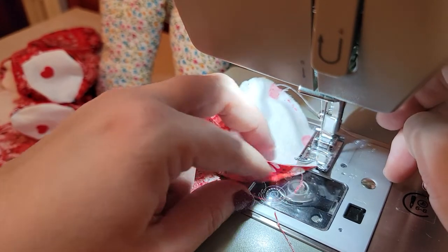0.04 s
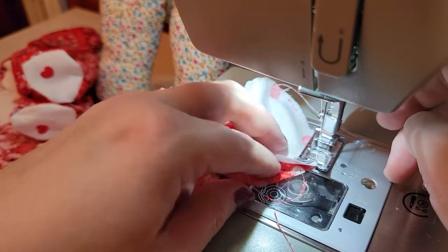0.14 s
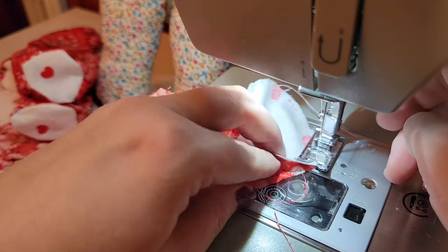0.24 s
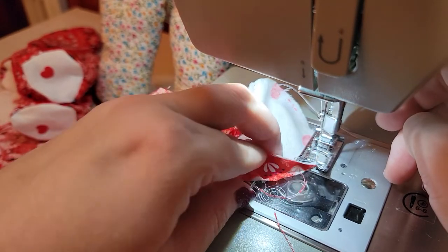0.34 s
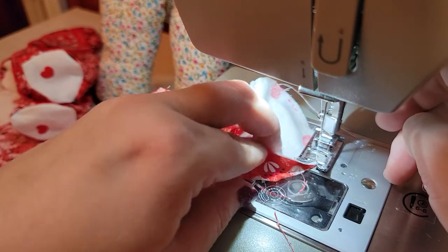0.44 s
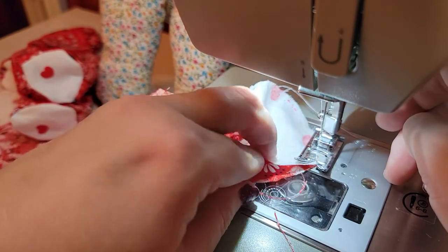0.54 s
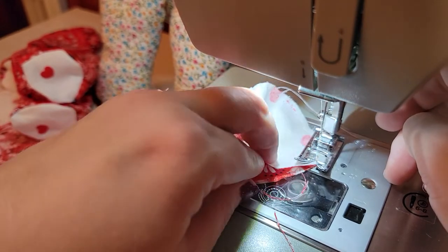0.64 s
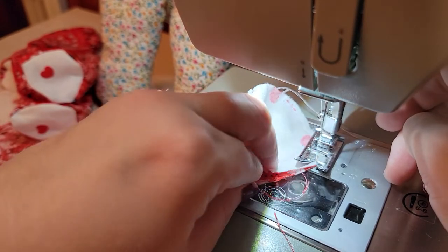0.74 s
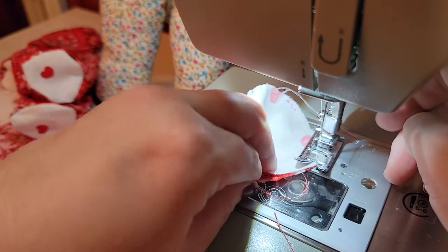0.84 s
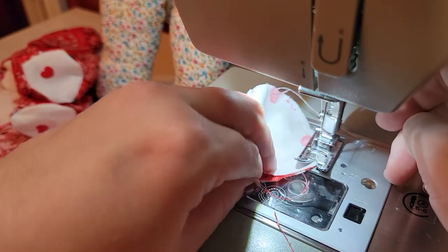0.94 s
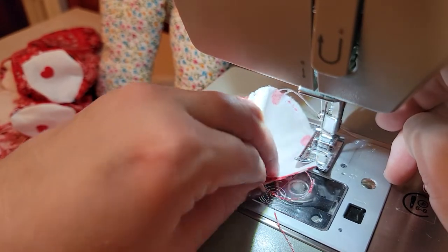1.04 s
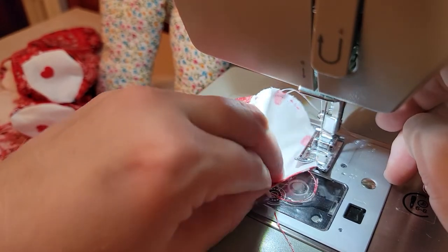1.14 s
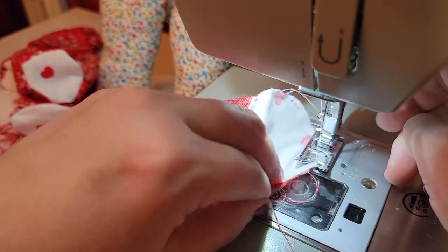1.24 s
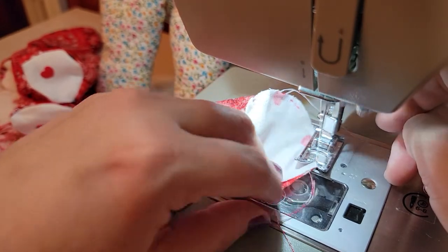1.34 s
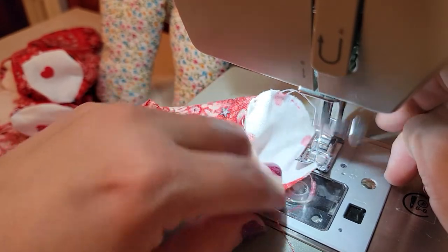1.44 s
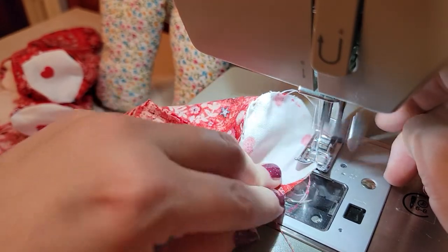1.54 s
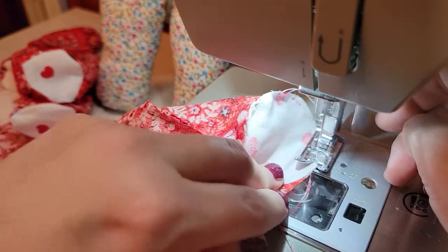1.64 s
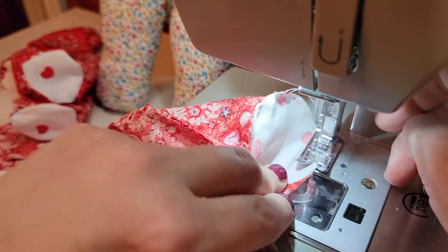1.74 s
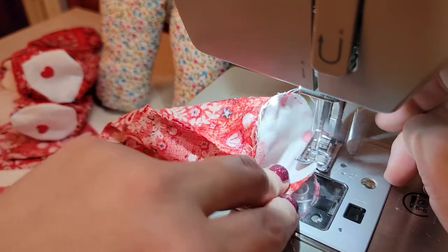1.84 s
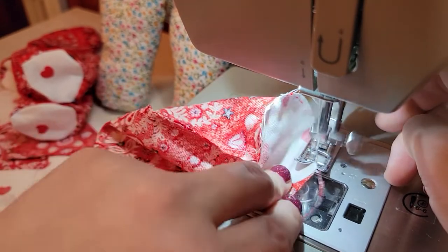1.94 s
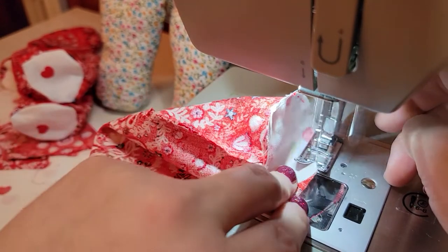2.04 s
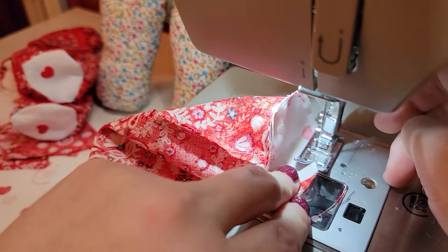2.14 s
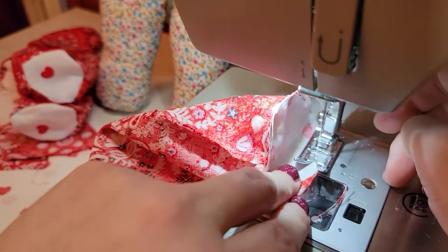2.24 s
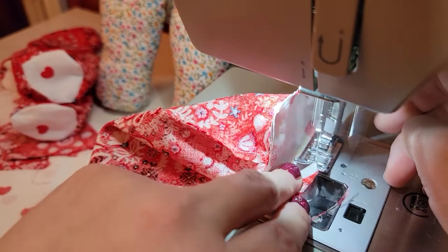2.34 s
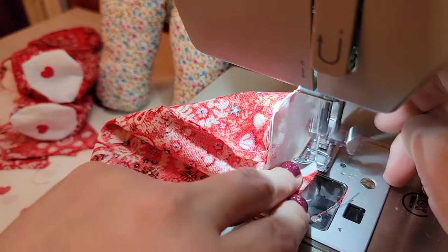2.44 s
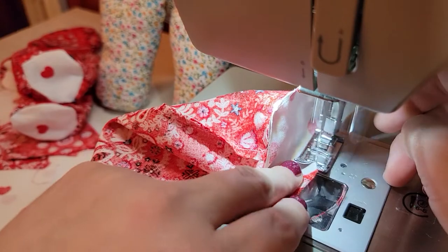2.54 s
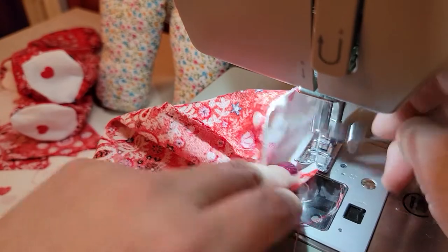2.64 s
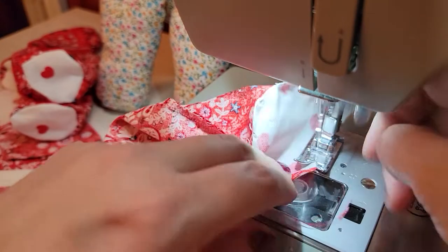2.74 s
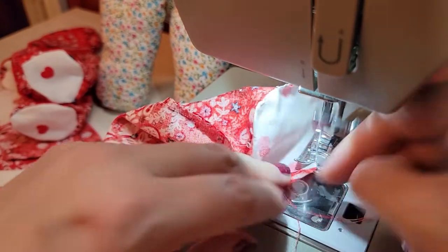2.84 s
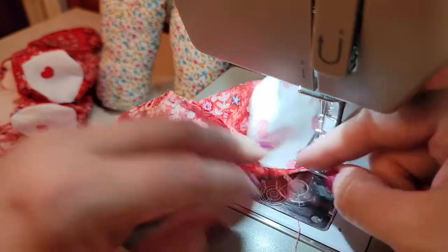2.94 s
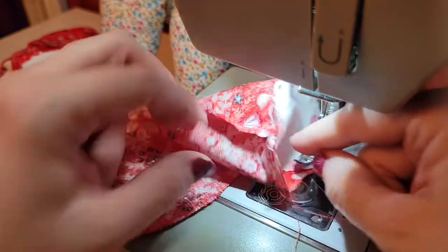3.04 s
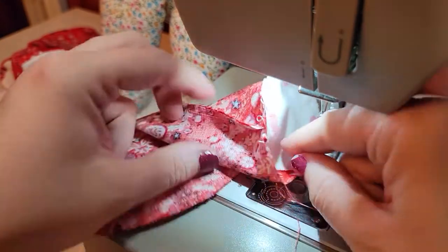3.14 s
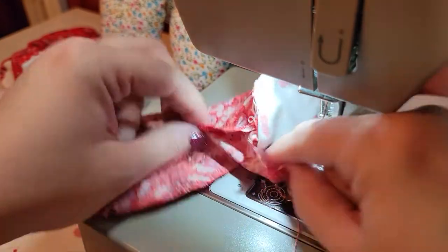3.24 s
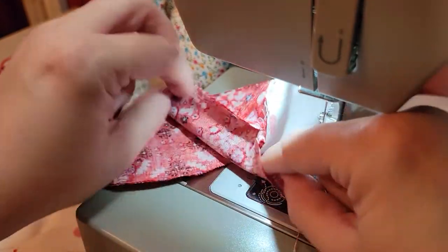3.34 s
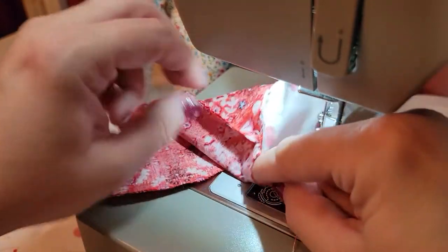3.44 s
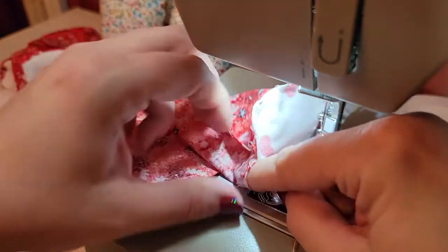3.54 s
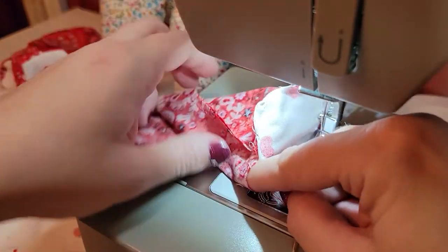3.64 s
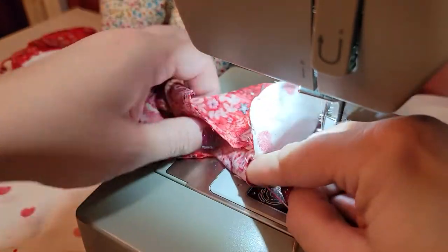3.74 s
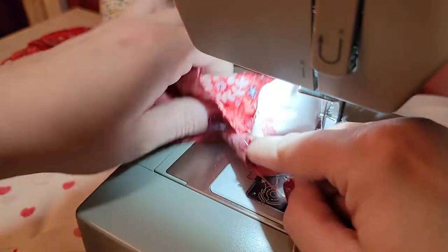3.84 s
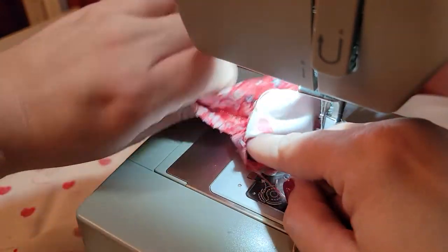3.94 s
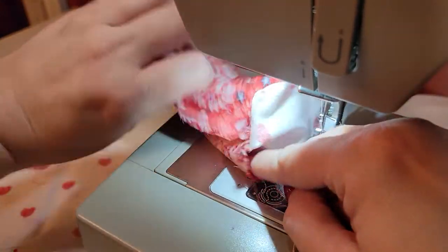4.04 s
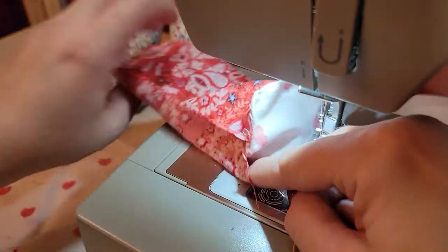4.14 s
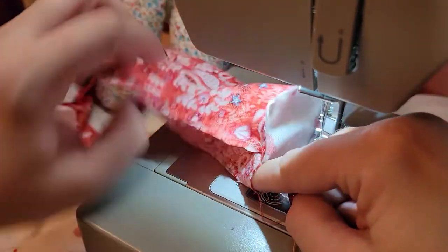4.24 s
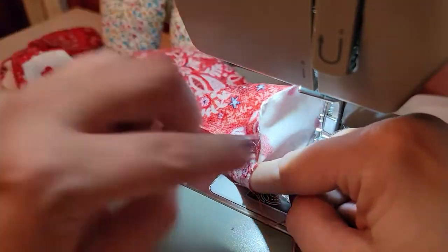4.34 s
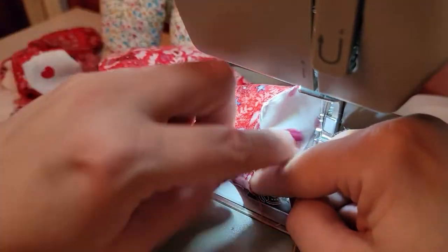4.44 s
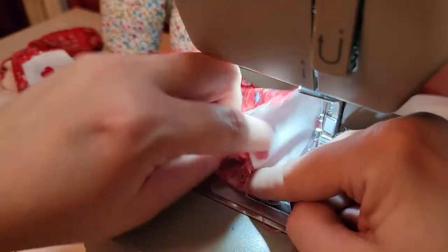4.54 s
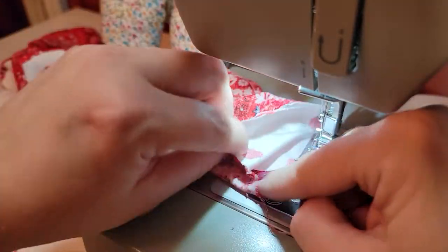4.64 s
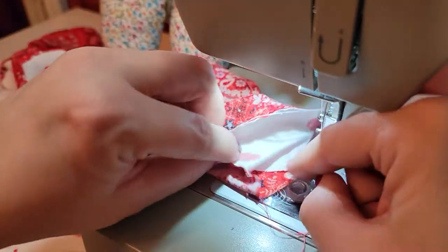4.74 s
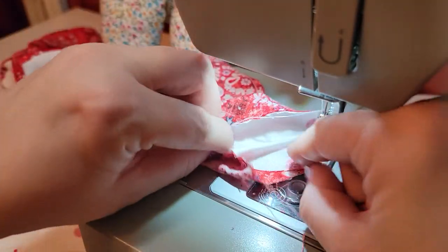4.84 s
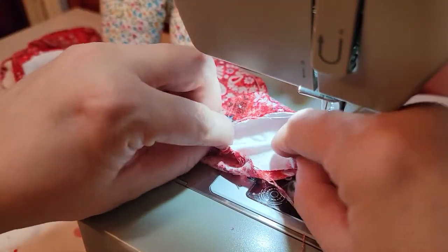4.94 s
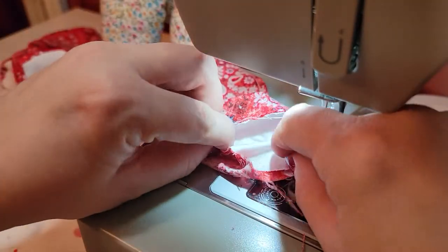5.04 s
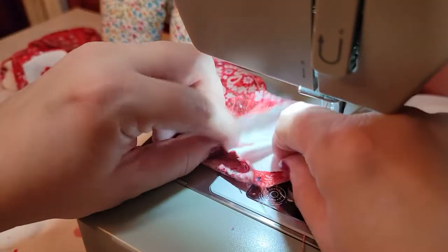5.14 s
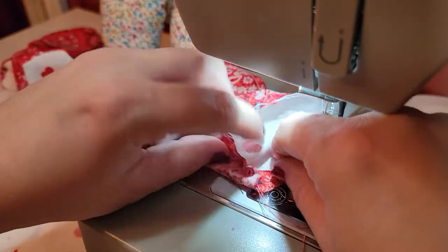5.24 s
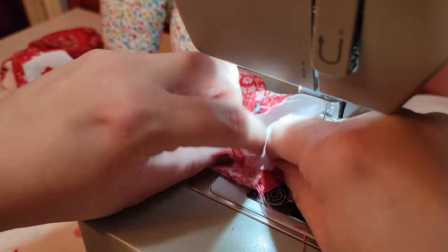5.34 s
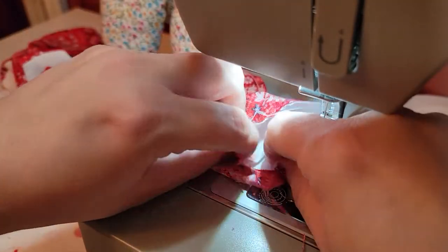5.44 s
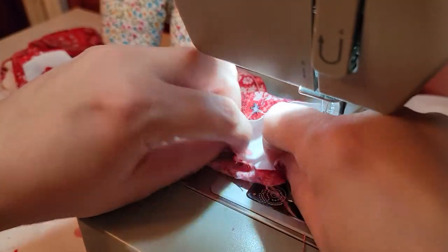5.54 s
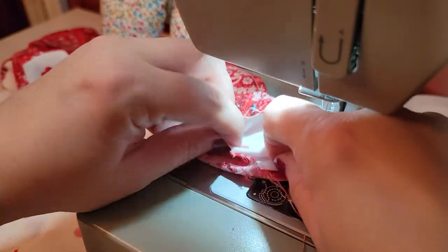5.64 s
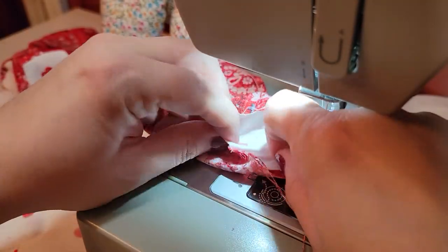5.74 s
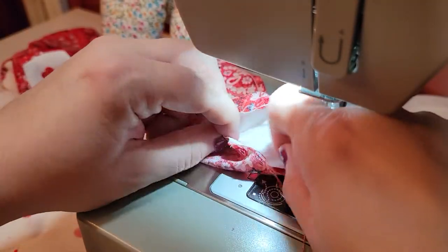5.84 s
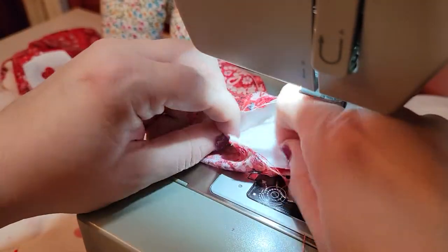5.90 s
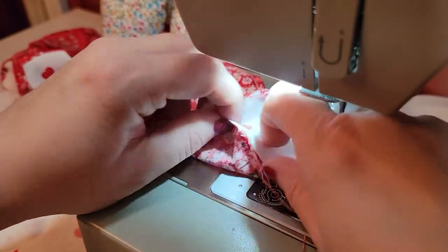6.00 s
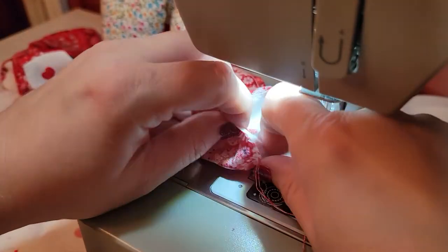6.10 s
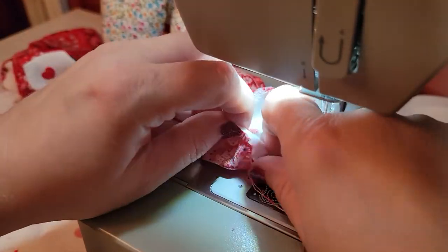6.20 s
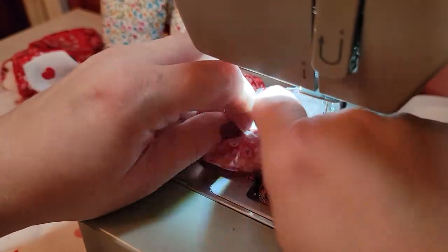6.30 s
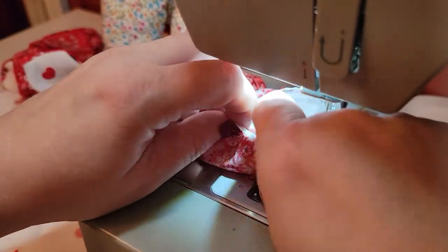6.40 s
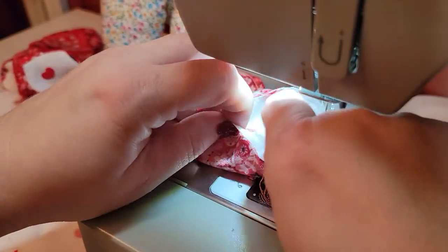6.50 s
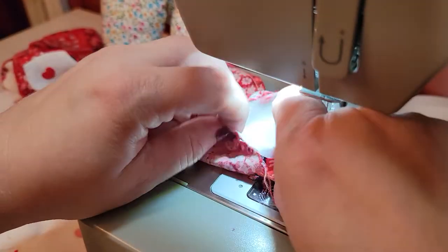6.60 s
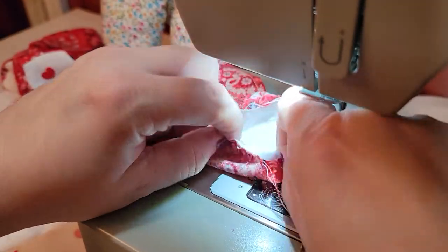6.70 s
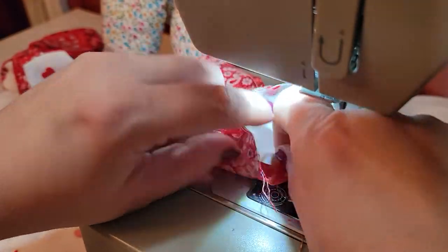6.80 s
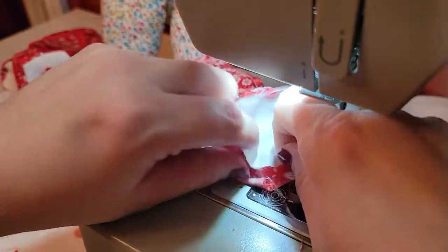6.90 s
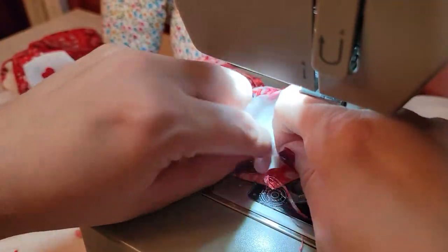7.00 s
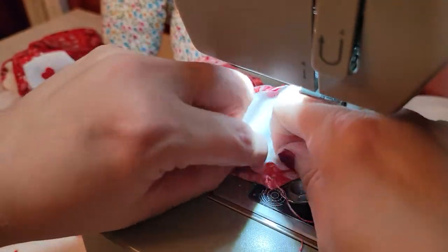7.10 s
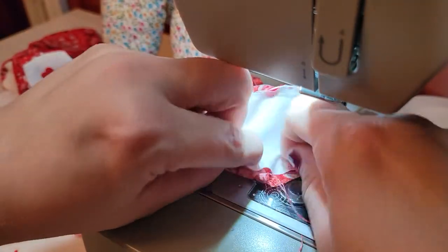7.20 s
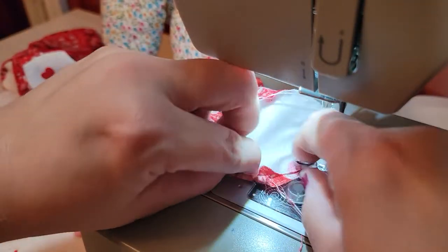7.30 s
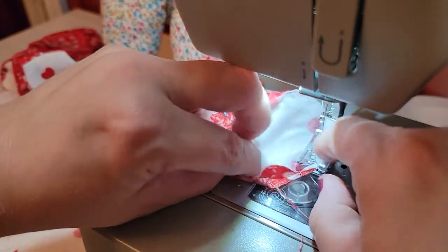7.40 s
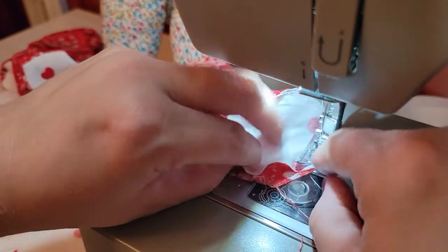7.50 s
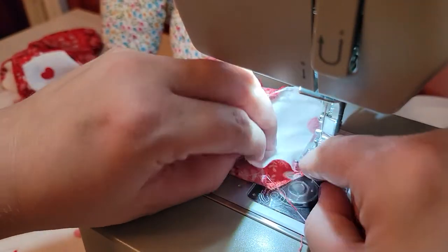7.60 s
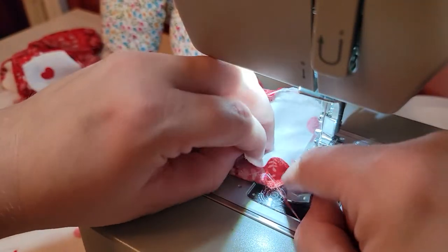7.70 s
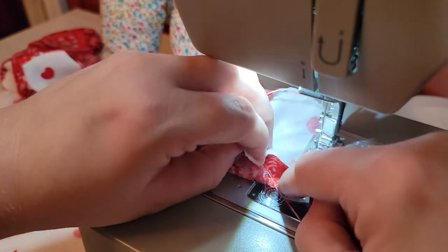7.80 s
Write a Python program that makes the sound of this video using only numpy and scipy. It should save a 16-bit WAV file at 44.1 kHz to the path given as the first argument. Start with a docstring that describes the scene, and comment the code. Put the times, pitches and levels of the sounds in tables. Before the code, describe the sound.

In a quiet room, two small plastic clicks and a few faint finger taps come first. An electric sewing machine then buzzes into motion, its whine rising over rapid knocking, rattling stitches before it coasts to a stop. The presser foot lever gives one sharp clack. After that, fingers softly rustle cloth and tap the machine's bed and metal plate, all very close to the microphone.

```python
"""Two small clicks of a plastic panel in a quiet room, then fingers tap and shift cloth on the bed of an
electric sewing machine, a hand's width from a phone. It runs one short seam: the motor buzzes, the
toothed belt whines up and coasts down, the needle bar knocks twice a stitch and the hook rattles once.
The sprung presser foot lever clacks down; fingers turn the cloth and tap the steel needle plate."""
import sys
import numpy as np
from scipy import signal
from scipy.fft import rfft, irfft, next_fast_len
from scipy.io import wavfile
from scipy.ndimage import uniform_filter1d, map_coordinates

SR = 44100
rng = np.random.default_rng(int(sys.argv[2]) if len(sys.argv) > 2 else 0)


def unload_audio(sound):
    """Save the sound as a 16-bit wav file, at the path given as the first command line argument."""
    columns = np.transpose(np.atleast_2d(sound))
    # keep every value between -1 and 1, then stretch to whole-number steps
    steps = np.round(np.clip(columns, -1, 1) * 32767)
    wavfile.write(sys.argv[1], SR, steps.astype(np.int16))


N = 346626
FFT_SIZE = next_fast_len(N + SR // 2, real=True)
TIME_S = np.arange(N) / SR
FREQ_HZ = np.maximum(np.fft.rfftfreq(FFT_SIZE, 1 / SR), 1)

PEDAL_DOWN_S, SLACK_GONE_S, PEDAL_UP_S, BAR_STOP_S = 1.275, 1.49, 2.6, 2.92
FULL_SPEED_HZ, STALL_HZ = 1050, 180  # belt tooth rates
TEETH_PER_STITCH, HOOK_PASS_S = 85.5, 2.283

# Table levels are relative; the functions add their own gains.
# room noise spectrum: f/Hz, level/dB
ROOM_SPECTRUM = [(12, -47), (20, -23.5), (40, -14), (56, -5.5), (86, 3), (110, -7.5), (216, -24.5),
                 (388, -19.5), (660, -32), (759, -27.5), (1030, -37), (1330, -33), (5680, -48.5),
                 (8410, -54.5), (14300, -55.5), (16000, -51.5)]

# plastic panel clicks: t/s, ring level/dB, click level/dB
CASING_CLICKS = [(0.092, -39, -41), (0.136, -40, -35.5)]
# panel ring: f/Hz, level/dB, t60/s
CASING_RING = [(371, 3, 0.17), (458, -1, 0.067), (707, -5, 0.12), (1376, -10, 0.09), (2300, -18, 0.15)]
# panel click spectrum: f/Hz, level/dB
CASING_SPECTRUM = [(200, -24), (600, 8), (1000, -10), (1500, -2), (2500, -9), (4200, -7.5), (7400, -17),
                   (10000, -22), (16000, -36)]
# faint whistles: t/s, length/s, f/Hz, level/dB
WHISTLES = [(0.144, 0.5, 1660, -74.5), (0.761, 0.051, 2210, -64.5), (0.972, 0.32, 1650, -68.5),
            (3.148, 0.18, 2190, -70), (5.384, 0.06, 2084, -66.5)]

# finger taps: t/s, level/dB, hardness/dB (tip low, nail high), left-right/dB, spot f/Hz
TAPS = [(0.62, -47, -9, -2, 603), (0.72, -48.5, -14, 0, 420), (0.874, -44, -13, -9, 408),
        (1.017, -52, -20, -28, 735), (1.191, -40.5, 11, -2, 720), (3.402, -42.5, 6, 4, 550),
        (3.639, -38, 2, 0, 585), (3.993, -33, -24, -3.5, 734), (3.997, -34, -19, -8, 390),
        (4.054, -44, -27, -3, 730), (4.586, -42.5, -25, 20, 320), (4.736, -52, 2, 2, 620),
        (4.765, -45.5, -27, -9, 542), (5.178, -45, 16, -1, 560), (5.206, -47.5, -3, -2, 605),
        (5.26, -39, 17, 5.5, 820), (5.893, -36.5, -7, -1.5, 483), (5.984, -40.5, -6, -2, 517),
        (6.146, -52, 9, -6, 904), (6.329, -40, -6, -2, 340), (6.376, -38.5, -21, -12, 330),
        (6.531, -51, -12, -1, 500), (6.635, -53.5, -9, 4, 999), (6.655, -53, -7, -4, 800),
        (6.714, -52, 1, 0, 800), (6.982, -50.5, -16, 6, 450), (7.184, -50.5, -1, 6, 451),
        (7.277, -43.5, -15, -2, 470), (7.3, -38.5, -4, 5, 406), (7.487, -31.5, 6.5, 1.5, 590),
        (7.491, -40, 2, -14, 440), (7.621, -49.5, -7, 8, 377)]
# hollow bed: f/Hz, width/Hz, level/dB
BED_MODES = [(149.5, 9.1, 8.5), (285, 19.4, -1), (354.7, 22.5, 5.5), (483, 180, -10)]
# needle plate: f/Hz, width/Hz, level/dB
PLATE_MODES = [(1180, 110, 23.5), (1510, 230, 20.5), (2014, 200, 18), (2400, 95, 14), (2800, 180, 14.5),
               (3290, 144, 17), (4140, 240, 2), (4540, 67, -18)]

# cloth shifts: t/s, length/s, rub level/dB, swish level/dB
CLOTH_SHIFTS = [(0.733, 0.12, -58, -79), (1.075, 0.5, -61.5, -72), (3.172, 0.08, -61.5, -70),
                (3.289, 0.18, -63, -60), (3.65, 0.16, -57, -57.5), (3.989, 0.21, -62.5, -61),
                (4.202, 0.19, -72.5, -73), (4.585, 0.17, -74, -66.5), (4.846, 0.083, -56, -74.5),
                (4.908, 0.11, -84, -69.5), (5.297, 0.32, -68, -74.5), (5.615, 0.085, -50, -74),
                (5.72, 0.19, -63, -88), (6.149, 0.14, -64.5, -75), (6.378, 0.089, -52, -63),
                (6.696, .11, -67.5, -78), (7.044, 0.15, -79, -76), (7.268, 0.33, -64, -71),
                (7.63, 0.11, -61, -81)]
# cloth on the bed: f/Hz, level/dB
RUB_SPECTRUM = [(120, -43.5), (200, -19), (290, -7), (425, -6), (818, -9), (1220, -12), (1620, -17),
                (2280, -17.5), (2630, -20), (4200, -23.5), (6000, -39.5), (7800, -80)]
# bed under dragged cloth: f/Hz, width/Hz, level/dB
DRAG_MODES = [(302, 47, 3.5), (391, 51, -2.5), (505, 45, -4), (724, 70, -6.5), (1243, 79, -11)]
# cloth between fingers: f/Hz, level/dB
SWISH_SPECTRUM = [(1060, -31), (1800, 4.5), (2240, -4), (2460, -0.5), (5060, -1.5), (5590, -5),
                  (9950, -8.5), (12800, -7.5), (16000, -5)]

# drive speed: t/s, belt tooth rate/Hz
DRIVE_SPEED = [(1.27, 39), (1.4, 188), (1.65, 686), (1.7, 755), (1.85, 884), (1.95, 946), (2.05, 986),
               (2.2, 1016), (2.56, 1058), (2.6, 1018), (2.7, 792), (2.8, 575), (2.97, 285), (3.1, 60)]
# motor and mounting: f/Hz, width/Hz, level/dB
MOTOR_MODES = [(114, 33, -2), (368, 34, -2.5), (673, 49, 3), (792, 29, -3), (1680, 78, -21),
               (2460, 51, -20.5), (2940, 170, -25), (3180, 80, -29.5)]
# housing frame: f/Hz, width/Hz, level/dB
FRAME_MODES = [(108, 27, -0.5), (262.9, 4.1, -2), (353, 36, -2), (383.2, 24, 1.5), (516, 28, -5),
               (650, 22, -6), (756, 29, -5.5), (845, 17, -10.5)]
# housing panels: f/Hz, width/Hz, level/dB
PANEL_MODES = [(1310, 150, -7.5), (2050, 63, -2.5), (2380, 100, -19.5), (3054, 24, -10.5),
               (3760, 330, -18.5), (3670, 380, -29)]
# running linkage: f/Hz, level/dB
CLATTER_SPECTRUM = [(25, -53.5), (50, -35), (90, 6.5), (200, -2), (450, -1.5), (850, 2), (1100, -3.5),
                    (1700, -4.5), (2800, -8.5), (4300, -11.5), (5200, -23.5), (8000, -37.5), (16000, -39)]
# hook rattle: f/Hz, level/dB
HOOK_SPECTRUM = [(2650, -27), (4500, -4), (6400, -8), (7500, -4), (8920, -15), (10600, -10.5), (11900, -13),
                 (15000, -11), (16000, -13.5)]

# linkage rattles at start and stop: t/s, level/dB
SLACK_RATTLES = [(1.43, -36.5), (1.467, -32), (1.51, -24.5), (2.8115, -19), (2.825, -25), (2.872, -28),
                 (2.887, -29.5), (3.082, -40), (3.0969, -29.5), (3.1075, -26.5)]
# loose linkage: f/Hz, width/Hz, level/dB
LINKAGE_MODES = [(1280, 60, -1), (2112, 58, -2), (2910, 160, -0.5), (3440, 80, -3), (3824, 52, 0.5),
                 (5700, 250, -15)]
# metal contact: f/Hz, level/dB
METAL_SPECTRUM = [(100, -25.5), (400, -5), (1000, 6.5), (2000, -0.5), (3800, 1), (5500, -12), (9000, -17.5),
                  (15000, -17.5)]
# hook and thread guide ticks: phase/stitch, level/dB
STITCH_TICKS = [(.185, -19), (0.799, -18.5), (.975, -18.5)]

# housing's radiation of drive tones: f/Hz, level/dB
DRIVE_RADIATION = [(60, -75.5), (200, -50.5), (300, -34.5), (345, -25), (385, -22), (440, -35),
                   (480, -34.5), (540, -27.5), (630, -23), (690, -28.5), (770, -14.5), (850, -23.5),
                   (920, -25.5), (965, -34), (1050, -40.5), (1800, -40.5), (1970, -23), (2080, -22.5),
                   (2230, -36), (2460, -30), (2700, -38.5), (3100, -34.5), (3350, -32), (3600, -25),
                   (3950, -30.5), (4200, -32.5), (5000, -43.5)]
# belt and motor overtones: f/tooth rate, level/dB
DRIVE_OVERTONES = [(2, -9.5), (2.388, -14), (3, -8), (4, -11), (5.001, -13), (6, -15.5)]

# hard stitches: t/s, knock level/dB, tick level/dB
HARD_STITCHES = [(1.491, -13, -21.5), (1.571, -15.5, -20.5), (1.619, -14.5, -21.5), (1.662, -15.5, -20),
                 (1.713, -11, -21.5), (1.777, -13.5, -23), (1.868, -15, -18), (1.906, -13.5, -23),
                 (1.961, -10.5, -18.5), (2.048, -13, -14), (2.084, -9, -18.5), (2.136, -9, -16.5),
                 (2.167, -11, -22), (2.218, -6.5, -9.5), (2.251, -13.5, -17), (2.301, -7.5, -13.5),
                 (2.334, -8.5, -17.5), (2.384, -5.5, -16), (2.417, -11.5, -16), (2.466, -9.5, -19),
                 (2.499, -12, -22), (2.547, -13, -20), (2.577, -10.5, -18.5), (2.63, -13.5, -13)]
# knock spectrum: f/Hz, level/dB
KNOCK_SPECTRUM = [(50, -29), (110, -9), (200, -5.5), (400, -8), (800, 2.5), (1050, -6.5), (1400, -5),
                  (3000, -22), (6000, -30.5), (16000, -47.5)]
# needle bar: f/Hz, width/Hz, level/dB
BAR_MODES = [(297, 13, 9.5), (603.3, 78, -6), (780, 130, 3), (860, 40, 4.5)]

# blows on the steel parts: phase/stitch, level/dB at full speed
STEEL_STROKES = [(.42, -22), (.92, -18.5)]
# steel parts: f/Hz, level/dB, t60/s
STEEL_RING = [(1996, 1, 0.1), (2080, -3, 0.07), (2385, -5, 0.08), (2435, -6, 0.057), (3060, -3, 0.09),
              (3428, -8.5, 0.05), (3980, -2.5, 0.047), (4180, -6.5, 0.05), (5150, -9.5, 0.02),
              (6360, -15, 0.02), (7100, -15, 0.022)]
# needle bar reversals: phase/stitch, level/dB at full speed
ARM_STROKES = [(.17, -22.5), (.67, -22)]
# hollow arm: f/Hz, level/dB, t60/s
ARM_RING = [(267, -9.5, 0.15), (293, -10, 0.2), (365, -2.5, 0.14), (390.5, 0.5, 0.14), (518, -5.5, 0.15)]

# thread snapping free: t/s, level/dB, left-right/dB
THREAD_SNAPS = [(1.7612, -11, -4), (3.597, -53, 7), (4.0785, -37, 9), (4.1985, -37, 11), (6.035, -52, 9)]
# snap spectrum: f/Hz, level/dB
SNAP_SPECTRUM = [(300, -35.5), (2500, -5.5), (4200, -6), (6300, -3.5), (10000, -11.5), (15000, 3)]

# presser foot lever blows: t/s, crack level/dB, thud level/dB
LEVER_BLOWS = [(3.783, -25.5, -31), (3.796, -16.5, -24), (3.801, -32, -15)]
# lever ring: f/Hz, level/dB, t60/s
LEVER_RING = [(148, 4, 0.23), (364, 6, 0.051), (410, 1.5, 0.11), (530, -17, 0.13), (770, -9, 0.076),
              (1000, -18, 0.038), (1270, -4, 0.056), (1483, -1.5, 0.074), (2170, -16, 0.14),
              (2625, -14.5, 0.17), (2880, -3.5, 0.079), (3700, -3, 0.046), (4850, -18, 0.063)]
# lever crack: f/Hz, level/dB
LEVER_SPECTRUM = [(59, -41), (100, -23), (244, -19.5), (389, -4), (600, -16), (1300, -18), (3540, -21),
                  (5650, -29), (8830, -32), (9610, -42), (13500, -30), (16000, -62)]

# machine's balance at the microphone ports: f/Hz, left-right/dB
PORT_BALANCE = [(60, -0.5), (110, -1.5), (265, -7), (380, -5.5), (530, -4.5), (750, -12), (1290, -2.5),
                (2050, -5), (2600, -1), (4400, -3.5), (8120, 3.5), (15000, -4)]
# phase between ports: f/Hz, left lead/rad
PORT_PHASE = [(110, 0.62), (265, 0), (380, -1.44), (530, -3.5), (1300, -4), (2050, -5.5), (4200, -3.5),
              (7300, -9), (12000, -31.5), (16000, -29)]
# direct path to the left port: f/Hz, amplitude share/1
PORT_DIRECT = [(110, 1), (400, 0.77), (800, 0.26), (3000, 0.46)]


def undb(db):
    """Decibels to gain."""
    return 10 ** (np.asarray(db) / 20)


def unit(x):
    """Scale to rms 1."""
    return x / np.sqrt(np.mean(x ** 2))


def across(points):
    """Interpolate (f/Hz, value) points over log frequency."""
    hz, value = np.transpose(points)
    return np.interp(np.log(FREQ_HZ), np.log(hz), value)


def colour(points):
    """Minimum-phase response from (f/Hz, level/dB) points."""
    cepstrum = irfft(np.log(undb(across(points))), FFT_SIZE)
    return np.exp(rfft(np.r_[cepstrum[0], 2 * cepstrum[1:FFT_SIZE // 2]], FFT_SIZE))


def lowpass(hz, order=4):
    """Butterworth response: soft contacts and heavy parts pass no treble."""
    return signal.freqs(*signal.butter(order, 1, analog=True), FREQ_HZ / hz)[1]


def modes(rows):
    """Response of (f/Hz, width/Hz, level/dB) resonances."""
    return sum(undb(db) / (1 + 1j * (FREQ_HZ / hz - hz / FREQ_HZ) * hz / width_hz)
               for hz, width_hz, db in rows)


def ringing(rows):
    """Response of (f/Hz, level/dB, t60/s) decaying sines, low bass cut."""
    age_s = TIME_S[:SR // 2]
    ring = sum(undb(db) * np.sin(2 * np.pi * hz * age_s) * undb(-60 * age_s / t60_s)
               for hz, db, t60_s in rows)
    return rfft(ring, FFT_SIZE) * (1 - lowpass(72, order=1)) ** 2


def through(x, response):
    """Filter by a frequency response."""
    return irfft(rfft(x, FFT_SIZE) * response, FFT_SIZE)[..., :N]


def wander(rate_hz):
    """Smooth random curve, spread near 1."""
    step = int(SR / rate_hz)
    return 1.3 * uniform_filter1d(np.repeat(rng.standard_normal(N // step + 1), step), step)[:N]


def grains(rate_hz, spread_db):
    """Random tiny impacts of uneven size, rms 1."""
    size = undb(spread_db * np.minimum(rng.exponential(size=N), 4))
    return unit((rng.random(N) < rate_hz / SR) * rng.standard_normal(N) * size)


def held(start_s, length_s, attack_s, release_s):
    """Envelope: linear rise, hold, exponential decay."""
    rise = np.clip((TIME_S - start_s) / attack_s, 0, 1)
    return rise * np.exp(-np.clip((TIME_S - start_s - length_s) / release_s, 0, 30))


def pedal(attack_s, release_s):
    """Envelope of the pressed pedal."""
    return held(PEDAL_DOWN_S, PEDAL_UP_S - PEDAL_DOWN_S, attack_s, release_s)


def strike(times_s, peaks_db, response, chatter, t60_s):
    """Blows into a body: one push, then dying chatter of loose parts."""
    age_s, out = TIME_S[:SR // 5], np.zeros(N + SR)
    ring = irfft(response, FFT_SIZE)[:len(age_s)]
    for t_s, db in zip(times_s, peaks_db):
        push = chatter * rng.standard_normal(len(age_s)) * undb(-60 * age_s / t60_s)
        push[0] += 1
        push *= 1 - np.clip(chatter, 0, 1) * np.exp(-age_s / .0015)  # looser contact, softer onset
        blow = signal.fftconvolve(push, ring)[:len(age_s)]
        start = int(t_s * SR)
        out[start:start + len(blow)] += undb(db) * blow / np.abs(blow).max()
    return out[:N]


def effort(tooth_hz, growth_db):
    """Gain of a moving part: growth_db per doubling of speed, more under torque, fading near stall."""
    speed = np.maximum(tooth_hz / FULL_SPEED_HZ, 1e-6)
    torque_db = 6 * pedal(.005, .02) * (1 - speed)
    slack_db = 150 * np.minimum(TIME_S - SLACK_GONE_S, 0)  # fades in as the belt tightens
    moving = tooth_hz ** 2 / (tooth_hz ** 2 + STALL_HZ ** 2)
    return undb(growth_db * np.log2(speed) + torque_db + slack_db) * moving


def each_stitch(stitch, blows, gain, scatter_db):
    """Times and levels of blows that recur in every stitch."""
    times_s, peaks_db = [], []
    for phase, db in blows:
        at = np.flatnonzero(np.diff(np.floor(stitch - phase)))
        chance = rng.standard_normal(64)[:len(at)]
        times_s.extend(TIME_S[at])
        peaks_db.extend(db + 20 * np.log10(gain[at]) + scatter_db * chance)
    return times_s, peaks_db


def echoes(x, t60_s):
    """Diffuse, uncoloured reflections at the source's energy."""
    age_s = TIME_S[:SR // 2]
    tail = rng.standard_normal(len(age_s)) * undb(-60 * age_s / t60_s) * (1 - np.exp(-age_s / .002))
    white_tail = irfft(np.exp(1j * np.angle(rfft(tail))))[:int(t60_s * SR)]
    return signal.oaconvolve(x, white_tail / np.linalg.norm(white_tail))[:N]


def ports(x, bounce_t60_s=.034):
    """The right port faces the machine; the left hears it shaded, late and through reflections."""
    share = np.clip(across(PORT_DIRECT), 0, .97)
    shade = undb(across(PORT_BALANCE))
    direct = shade * share * np.exp(1j * across(PORT_PHASE))
    bounced = shade * np.sqrt(1 - share ** 2)
    gain = 2 / np.hypot(np.abs(1 + direct), bounced)  # mean of the ports keeps the level
    left = through(x, gain * direct) + through(echoes(x, bounce_t60_s), gain * bounced)
    return np.array([left, through(x, gain)])


def room(level_db=-54.5, air_db=-.53):
    """Gently swelling rumble, alike at both ports, under faint wide hiss."""
    mid, side = unit(through(rng.standard_normal((2, N)), colour(ROOM_SPECTRUM)))
    side_db = across([(30, -7.5), (80, -15), (200, -8.5), (600, 4.5), (4000, 0)])
    side = through(side, undb(side_db))
    shelf_db = across([(120, .001), (400, air_db)])
    return through(np.array([mid + side, mid - side]), undb(shelf_db)) * undb(level_db + .8 * wander(6))


def casing():
    """A loose plastic panel gives under the hand and springs back: two clicks with a hollow ring."""
    t_s, ring_db, click_db = np.transpose(CASING_CLICKS)
    ring = strike(t_s, ring_db, ringing(CASING_RING), chatter=.037, t60_s=.026)
    clicks = [strike(t_s, click_db, colour(CASING_SPECTRUM), chatter=.43, t60_s=.045) for _ in range(2)]
    return ring + np.array(clicks)


def whistles(width_hz=200):
    """Faint narrow bands of hiss come and go."""
    out = 0
    for t_s, length_s, hz, db in WHISTLES:
        band = unit(through(rng.standard_normal((2, N)), modes([(hz, width_hz, 0)]) ** 2))
        out += band * undb(db) * held(t_s, length_s, .014, .019)
    return out


def pats(times_s, peaks_db, spots_hz, width_hz=130, t60_s=.067):
    """Soft touches, each ringing its spot at that spot's pitch."""
    age_s, out = TIME_S[:SR // 5], np.zeros(N + SR)
    for t_s, db, hz in zip(times_s, peaks_db, spots_hz):
        push = rng.standard_normal(len(age_s)) * undb(-60 * age_s / t60_s)
        ring = signal.lfilter(*signal.iirpeak(hz, hz / width_hz, fs=SR), push)
        blow = signal.sosfilt(signal.butter(2, 2 * hz, fs=SR, output="sos"), ring)
        start = int(t_s * SR)
        out[start:start + len(blow)] += undb(db) * blow / np.abs(blow).max()
    return out[:N]


def taps(thump_db=1, knock_db=6, tick_db=5):
    """Fingers thump the hollow bed and knock its covers; harder touches tick the steel plate more."""
    t_s, level_db, hardness_db, pan_db, spot_hz = np.transpose(TAPS)
    blow_db = level_db - 10 * np.log10(undb(hardness_db) + undb(-hardness_db) + undb(7.5) ** 2)
    bed = modes(BED_MODES) * lowpass(390)
    plate = modes(PLATE_MODES) * lowpass(4500, order=2)
    thump = strike(t_s, blow_db - hardness_db / 2 + thump_db, bed, chatter=.052, t60_s=.13)
    out = []
    for side in (1, -1):
        port_db = blow_db + side * pan_db / 2
        knock = pats(t_s, port_db + knock_db, spot_hz)
        tick = strike(t_s, port_db + hardness_db / 2 + tick_db, plate, chatter=.44, t60_s=.033)
        out.append(thump + knock + tick)
    return np.array(out)


def cloth(rub_trim_db=-1.5, swish_trim_db=-3, hollow_db=12, attack_s=.075, release_s=.032):
    """Cotton drags over the hollow bed and swishes between the fingers."""
    def fibres(response):
        mid, side = unit(through(np.array([grains(4500, 3) for _ in range(2)]), response))
        return np.array([mid + side, mid - side])

    rub_gain = swish_gain = 0
    for t_s, length_s, rub_db, swish_db in CLOTH_SHIFTS:
        shift = held(t_s - attack_s / 2, length_s, attack_s, release_s)
        rub_gain += undb(rub_db + rub_trim_db) * shift
        swish_gain += undb(swish_db + swish_trim_db) * shift
    warped_index = np.cumsum(1 + .05 * wander(7))  # resonances drift as the hand moves
    rub = fibres(colour(RUB_SPECTRUM) * (1 + undb(hollow_db) * modes(DRAG_MODES)))
    rub = np.array([map_coordinates(x, [warped_index], order=1, mode="mirror") for x in rub])
    rub *= rub_gain * undb(3.1 * wander(60))
    swish = fibres(colour(SWISH_SPECTRUM)) * swish_gain * undb(1.71 * wander(60))
    return rub + swish


def motor_buzz(tooth_hz, mains_hz=60, start_db=-43, pull_db=14, full_pull_hz=300, ease_db=9):
    """The speed control kicks the motor twice a mains cycle; it growls under load and eases at speed."""
    kicks = np.diff(np.floor(TIME_S * 2 * mains_hz), prepend=0) * undb(2.5 * wander(100))
    body = sum(undb(db) * modes([(hz, 2 * width_hz, 0)]) ** 2 for hz, width_hz, db in MOTOR_MODES)
    growl = unit(through(unit(kicks) + .87 * grains(980, 3.8), body))
    load_db = pull_db * np.minimum(tooth_hz / full_pull_hz, 1) ** 2
    load_db -= ease_db * (tooth_hz / FULL_SPEED_HZ) ** 2
    judder_db = 3.5 * wander(50)
    return growl * undb(start_db + load_db + judder_db) * pedal(.0068, .027)


def frame_rumble(tooth_hz, stitch, swing, level_db=-25.5, thud_db=6):
    """The frame shakes, most as the feed drops in each stitch."""
    feed_drop = np.exp(-((stitch % 1 - .7) / .11) ** 2)
    body = modes(FRAME_MODES) * lowpass(1000) * (1 - lowpass(41, order=1)) ** 2
    rumble = unit(through(grains(2000, .63), body))
    return rumble * effort(tooth_hz, growth_db=7.5) * undb(level_db + thud_db * feed_drop + swing)


def clatter(tooth_hz, swing, linkage_db=-27.5, panels_db=-40):
    """Tiny impacts in linkage and panels, swelling once a stitch."""
    gain = effort(tooth_hz, growth_db=8)
    linkage = unit(through(grains(2200, 1.5), colour(CLATTER_SPECTRUM)))
    panels = unit(through(grains(1500, 1.2), modes(PANEL_MODES) * lowpass(4800)))
    return linkage * gain * undb(linkage_db + 1.1 * swing), panels * gain * undb(panels_db + 5.9 * swing)


def hook_rattle(tooth_hz, swing, level_db=-39.5):
    """The hook rattles brightly, loudest as it passes the needle."""
    rattle = unit(through(grains(5000, 6.8), colour(HOOK_SPECTRUM)))
    return rattle * effort(tooth_hz, growth_db=8.5) * undb(level_db + 3.7 * swing)


def slack_rattle():
    """The linkage rattles on taking up slack and on stopping, shaking steel parts and arm."""
    t_s, db = np.transpose(SLACK_RATTLES)
    rattle = strike(t_s, db - 3.5, colour(METAL_SPECTRUM), chatter=.85, t60_s=.035)
    steel = strike(t_s, db - 7, modes(LINKAGE_MODES), chatter=.53, t60_s=.04)
    arm = strike(t_s, db - 12, ringing(ARM_RING) * lowpass(560), chatter=.1, t60_s=.02)
    return rattle + steel + arm


def thread_ticks(tooth_hz, stitch):
    """Hook and thread guides tick in every stitch, fading after the pedal is released."""
    gain = effort(tooth_hz, growth_db=11.5) * pedal(.005, .078) + 1e-9
    t_s, db = each_stitch(stitch, STITCH_TICKS, gain, scatter_db=.5)
    metal = strike(t_s, db, colour(METAL_SPECTRUM), chatter=.6, t60_s=.071)
    thread = strike(t_s, db, colour(SNAP_SPECTRUM), chatter=.51, t60_s=.055)
    return undb(-3) * metal + undb(-10) * thread


def belt_whine(tooth_hz, swing, belt_db=-3.5, rasp_db=-12, growth_db=7, throb_db=2, slap_db=3.5):
    """Teeth sing on the pulley and rasp as the belt flaps; partials flare at housing resonances."""
    def radiated(hz):
        return undb(np.interp(hz, *np.transpose(DRIVE_RADIATION), left=-150))

    phase_rad = 2 * np.pi * np.cumsum(tooth_hz * (1 + .005 * wander(130))) / SR
    coast_db = -.5 * np.clip((TIME_S - PEDAL_UP_S) / .1, 0, 1)
    rasp = undb(rasp_db) * (wander(260) * np.sin(phase_rad) + wander(260) * np.cos(phase_rad))
    tone = undb(2 * wander(90)) * np.sin(phase_rad)
    out = radiated(tooth_hz) * undb(belt_db + coast_db) * (tone + rasp)
    drive_db = growth_db * np.log2(np.maximum(tooth_hz, 1) / FULL_SPEED_HZ) + throb_db * swing
    for multiple, db in DRIVE_OVERTONES:
        gain = radiated(multiple * tooth_hz) * undb(db + drive_db + slap_db * wander(120))
        out += gain * np.sin(multiple * phase_rad)
    taut = np.clip((TIME_S - SLACK_GONE_S) / .01, 0, 1)
    return np.sqrt(2) * out * taut


def hard_stitches():
    """Needle bar and feed hit their stops: a knock through frame and bar, plus a steel tick."""
    t_s, knock_db, tick_db = np.transpose(HARD_STITCHES)
    body = colour(KNOCK_SPECTRUM) * (1 + 1.3 * modes(FRAME_MODES) + modes(BAR_MODES))
    knock = strike(t_s, knock_db + 1.5, body, chatter=.07, t60_s=.02)
    return knock + strike(t_s, tick_db, colour(METAL_SPECTRUM), chatter=.4, t60_s=.011)


def bar_strokes(tooth_hz, stitch, steel_db_per_oct=9, boom_db_per_oct=3):
    """Each needle bar reversal booms the hollow arm; between reversals the steel parts ring."""
    running = held(SLACK_GONE_S, BAR_STOP_S - SLACK_GONE_S, .005, .03) + 1e-9
    speed_oct = np.log2(np.maximum(tooth_hz, 1) / FULL_SPEED_HZ)
    steel_gain = undb(steel_db_per_oct * speed_oct) * running
    t_s, db = each_stitch(stitch, STEEL_STROKES, steel_gain, scatter_db=.83)
    steel = strike(t_s, db, ringing(STEEL_RING), chatter=.44, t60_s=.03)
    boom_gain = undb(boom_db_per_oct * speed_oct) * running
    t_s, db = each_stitch(stitch, ARM_STROKES, boom_gain, scatter_db=.46)
    boom = strike(t_s, db, ringing(ARM_RING) * lowpass(560), chatter=.11, t60_s=.028)
    return steel, boom


def machine():
    """One seam: belt speed sets the whine and the stitch cycle."""
    tooth_hz = np.interp(TIME_S, *np.transpose(DRIVE_SPEED), left=0, right=0)
    stitch = np.cumsum(tooth_hz) / SR / TEETH_PER_STITCH
    stitch -= np.interp(HOOK_PASS_S, TIME_S, stitch)
    swing = np.cos(2 * np.pi * stitch)  # 1 as the hook passes the needle
    frame = frame_rumble(tooth_hz, stitch, swing)
    linkage, panels = clatter(tooth_hz, swing)
    hook = hook_rattle(tooth_hz, swing)
    knocks = hard_stitches()
    ticks = thread_ticks(tooth_hz, stitch)
    steel, boom = bar_strokes(tooth_hz, stitch)
    groups = (frame + hook, linkage, knocks + boom, panels + ticks + steel,
              belt_whine(tooth_hz, swing), motor_buzz(tooth_hz) + slack_rattle())
    return sum(ports(group) for group in groups)  # each with its own reflections


def thread_snaps():
    """Taut thread snaps free: a bright tick, nearer one port."""
    t_s, db, pan_db = np.transpose(THREAD_SNAPS)
    return np.array([strike(t_s, db + side * pan_db / 2, colour(SNAP_SPECTRUM), chatter=.8, t60_s=.016)
                     for side in (1, -1)])


def presser_lever():
    """The sprung presser bar slips off its cam and slams its stop: dry crack, thud, duller rattle."""
    t_s, crack_db, thud_db = np.transpose(LEVER_BLOWS)
    thud = strike(t_s, thud_db, ringing(LEVER_RING), chatter=.042, t60_s=.016)
    steel = colour(LEVER_SPECTRUM)
    out = []
    for _ in range(2):
        crack = strike(t_s, crack_db + 1, steel, chatter=1, t60_s=.035)
        rattle = strike(t_s, crack_db - 3, steel * lowpass(4600, order=2), chatter=.93, t60_s=.11)
        out.append(thud + crack + rattle)
    return np.array(out)


def scene(walls_db=-13, lean_db=-1.5):
    """Close sounds with a short room tail; the soft sounds lean slightly right."""
    near = machine() + presser_lever() + casing() + taps() + thread_snaps()
    walls = through(np.array([echoes(x, t60_s=.24) for x in near]), lowpass(6000, order=2))
    soft = (cloth() + whistles() + room()) * undb([[lean_db / 2], [-lean_db / 2]])
    return near + undb(walls_db) * walls + soft


def record(dry):
    """The phone rounds the highest peaks and cuts the top treble."""
    ceiling, top_hz = .9, 15900
    rounded = dry / (1 + (dry / ceiling) ** 4) ** .25
    return signal.sosfilt(signal.ellip(10, .2, 80, top_hz, fs=SR, output="sos"), rounded)


dry = scene()
out = record(dry)
unload_audio(out)
```